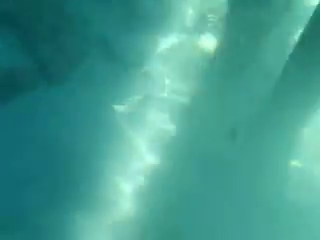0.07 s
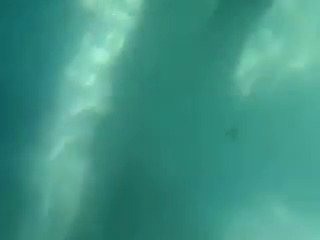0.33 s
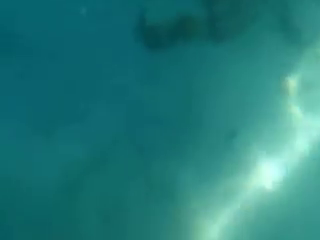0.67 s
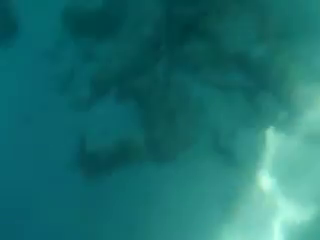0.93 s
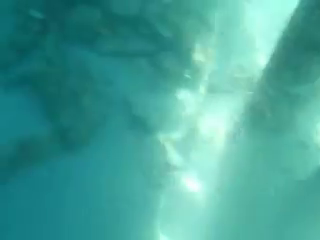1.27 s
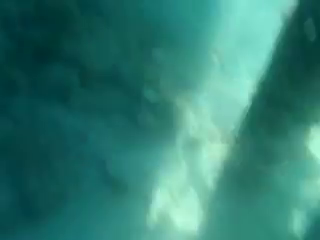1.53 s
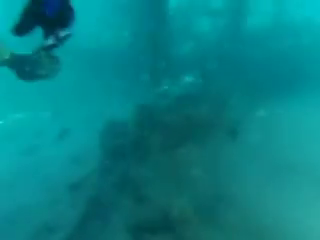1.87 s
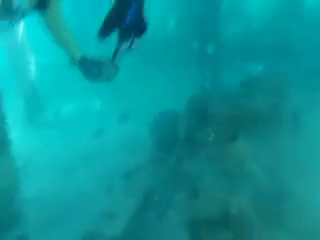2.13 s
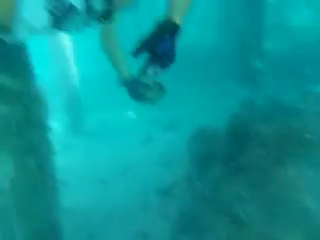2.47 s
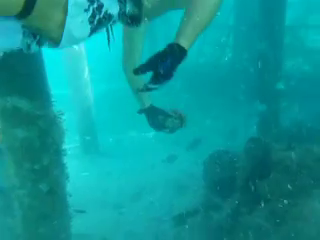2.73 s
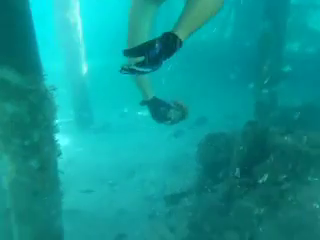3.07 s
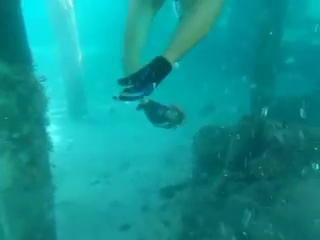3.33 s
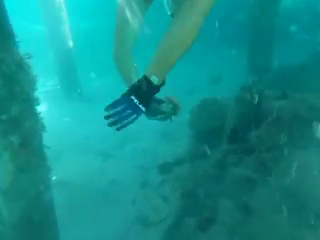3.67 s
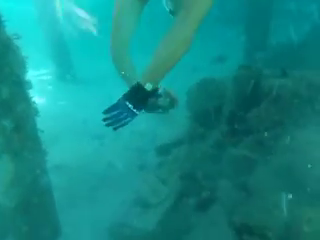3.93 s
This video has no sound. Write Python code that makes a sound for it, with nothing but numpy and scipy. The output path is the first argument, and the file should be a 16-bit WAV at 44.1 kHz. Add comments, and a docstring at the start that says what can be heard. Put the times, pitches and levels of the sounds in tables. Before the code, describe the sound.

Muffled underwater movement, hollow and rumbling, with small gurgling bubbles and two hard knocks.

```python
"""A hollow, wavering note sounds as a camera is carried through shallow sea water: the flow drives a resonance
of its housing. Eddies rumble against it, and small bubbles gurgle, tick and fizz. A few light taps and two hard
knocks strike it. The knocks overload the microphone; after each, a faint buzz lingers, and the sound falls
quiet and builds up again."""
import sys
import numpy as np
from scipy.fft import rfft, irfft, next_fast_len
from scipy.io import wavfile
from scipy.ndimage import uniform_filter1d

SR = 44100
rng = np.random.default_rng(int(sys.argv[2]) if len(sys.argv) > 2 else 0)


def store_wav(level_fs):
    """Save 16-bit WAV to argv[1]."""
    pcm = np.round(np.clip(np.atleast_2d(level_fs), -1, 1) * 32767)
    wavfile.write(sys.argv[1], SR, pcm.T.astype(np.int16))


N = 176400


def amp(db):
    """Decibels to amplitude ratio."""
    return 10 ** (np.asarray(db) / 20)


def unit(x):
    """Normalisation to rms 1."""
    return x / np.sqrt(np.mean(x ** 2) + 1e-20)


def gain_at(points, hz):
    """Amplitude response from (frequency, gain) points, interpolated on a log frequency axis."""
    freqs, db = np.transpose(points)
    return amp(np.interp(np.log(hz + 1), np.log(freqs + 1), db))


def envelope(stretches, offset_db):
    """Amplitude envelope from stretches of (time, level) points, interpolated in decibels."""
    times, db = np.vstack(stretches).T
    return amp(np.interp(np.arange(N) / SR, times, db) + offset_db)


def filtered(x, response):
    """Linear filtering: the spectrum is multiplied by a frequency response."""
    size = next_fast_len(N + SR // 2)
    return irfft(rfft(x, size) * response(np.fft.rfftfreq(size, 1 / SR)), size)[:N]


def coloured(x, spectrum):
    """Spectral shaping, at rms 1."""
    return unit(filtered(x, lambda hz: gain_at(spectrum, hz)))


def patter(per_s, spread_db):
    """Shot noise: impulses of random time, sign and size, at rms 1."""
    impulses = (rng.random(N) < per_s / SR) * rng.choice([-1, 1], N)
    return unit(impulses * amp(spread_db * np.clip(rng.standard_normal(N), -2, 2)))


def add(track, start_s, sound):
    """Superpose a sound on the track."""
    part = track[round(start_s * SR):][:len(sound)]
    part += sound[:len(part)]


def ping(hz, t60, attack_s):
    """One damped mode with a peak of 1; its decay is 60 dB in t60 seconds."""
    t = np.arange(SR // 5) / SR
    mode = np.sin(2 * np.pi * hz * t) * amp(-60 * t / t60) * (1 - np.exp(-t / attack_s))
    return mode / np.abs(mode).max()


def pings(events, attack_s, t60=None):
    """One damped mode per row (time, level, frequency), with the row's own t60 if it has one."""
    out = np.zeros(N)
    for s, db, hz, *own_t60 in events:
        add(out, s, amp(db) * ping(hz, own_t60[0] if own_t60 else t60, attack_s))
    return out


# Ring envelope, in stretches divided by the knocks (time [s], relative level [dB])
RING_LEVELS = [
    [(0.0, -26.5), (0.216, -28), (0.286, -19), (0.348, -23.5), (0.386, -14.5), (0.64, -35), (0.71, -17.5),
     (0.814, -31), (0.996, -18), (1.44, -28), (1.482, -16.5), (1.58, -33.5), (1.646, -17), (1.69, -20.5)],
    [(1.73, -62), (1.76, -56.5), (2.132, -46), (2.184, -16.5), (2.262, -20), (2.282, -30.5), (2.538, -22),
     (2.59, -29), (2.646, -23), (2.68, -44.5), (2.868, -30), (2.962, -37.5), (2.982, -28.5), (3.08, -30.5)],
    [(3.12, -47.5), (3.142, -56), (3.254, -54), (3.288, -47.5), (3.442, -44), (3.59, -26.5), (3.704, -13.5),
     (3.73, -21.5), (3.816, -18), (3.87, -21.5), (3.896, -20), (3.928, -14), (3.962, -30), (4.0, -16)],
]
# Colour around the resonance (frequency [Hz], gain [dB])
RING_COLOUR = [(100, -25.5), (250, -1), (380, 1), (470, -1.5), (600, -9), (900, -12.5), (1500, -43)]
def housing_ring(note_hz=438.3, bandwidth_hz=42):
    """Forced resonance: random pushes of the flow make the housing ring at its hollow note."""
    resonance = lambda f: 1j * f * bandwidth_hz / (note_hz ** 2 - f ** 2 + 1j * f * bandwidth_hz)
    ring = coloured(filtered(patter(per_s=700, spread_db=5), resonance), RING_COLOUR)
    running_rms = np.sqrt(np.abs(uniform_filter1d(ring ** 2, size=3000)) + 1e-6)
    return ring / running_rms * envelope(RING_LEVELS, offset_db=-1.5)


# Gulps of water (time [s], peak level [dB], frequency [Hz])
WATER_GULPS = [(.277, -8.5, 472.6), (0.384, -11.5, 410), (1.472, -15, 408), (1.638, -14, 431),
               (1.66, -10, 400.6), (2.204, -16, 430), (3.040, -19, 448), (3.682, -18.5, 432),
               (3.795, -15, 526), (3.888, -10.5, 437.4), (3.955, -8, 450.3)]
def gulps():
    """Gradual excitation: gulps of water swell the ring near its resonance."""
    return pings(WATER_GULPS, attack_s=0.02, t60=0.046)


# Hard knocks (time [s], level [dB], push rise [s], rebound delay [s], rebound over push [dB],
# rebound rise [s])
HARD_KNOCKS = [(1.6984, 1, 0.00023, .0042, 0.5, 0.00047), (3.0899, 0, 0.0014, .0049, 3.5, .0003)]
def knocks(push_hz=84, decay_s=0.0034):
    """Heavily damped transient: a pressure step, then a rebound of opposite sign."""
    out, t = np.zeros(N), np.arange(SR // 10) / SR
    damped = np.exp(-t / decay_s) * np.cos(2 * np.pi * push_hz * t)
    push = lambda rise_s: np.clip(t / rise_s, 0, 1) * damped
    for s, db, rise_s, delay_s, rebound_db, rebound_rise_s in HARD_KNOCKS:
        add(out, s, -amp(db) * push(rise_s))
        add(out, s + delay_s, amp(db + rebound_db) * push(rebound_rise_s))
    return out


# Light taps (time [s], peak level [dB], frequency [Hz], t60 [s])
HOUSING_TAPS = [(0.235, -13, 401, .022), (.381, -11, 560, 0.013), (.4155, -12.5, 549, 0.021),
                (0.4914, -7.5, 421, 0.04), (1.153, -19, 483, 0.069), (1.9665, -30.5, 417, 0.013),
                (2.1798, -14, 440, .035), (2.6408, -7.5, 385, 0.014), (2.8134, -17.5, 387, 0.026),
                (2.9857, -12.5, 506, 0.024), (3.359, -36.5, 448, 0.11), (3.4517, -39, 415, 0.07)]
def taps():
    """Free vibration: after a brief contact, one mode of the housing dies away."""
    return pings(HOUSING_TAPS, attack_s=0.00069)


# Rumble envelope (time [s], relative level [dB])
EDDY_LEVELS = [
    [(0.0, -32.5), (0.478, -26), (0.528, -22.5), (0.624, -44.5), (0.79, -14), (0.844, -34.5),
     (0.886, -32.5), (0.922, -34), (1.384, -36.5), (1.42, -25), (1.562, -46.5), (1.64, -41)],
    [(1.74, -52), (1.842, -61), (2.072, -46.5), (2.094, -35), (2.128, -46.5), (2.198, -25), (2.324, -36.5),
     (2.61, -37.5), (2.646, -23.5), (2.676, -43), (3.062, -40), (3.07, -32)],
    [(3.13, -71), (3.142, -55), (3.258, -73), (3.268, -70.5), (3.508, -56), (3.548, -48.5), (3.762, -43.5),
     (3.788, -35.5), (3.83, -51), (3.91, -36), (3.932, -52), (4.0, -31.5)],
]
# Rumble colour (frequency [Hz], gain [dB])
EDDY_COLOUR = [(20, -15.5), (40, -16.5), (70, -3), (130, -3), (220, 1), (320, -12), (500, -20), (900, -54)]
def eddies():
    """Turbulent pressure fluctuation: eddies buffet the housing with a low rumble."""
    rumble = coloured(patter(per_s=500, spread_db=1.5), EDDY_COLOUR)
    return rumble * envelope(EDDY_LEVELS, offset_db=-2.5)


# Thuds of water (time [s], peak level [dB], frequency [Hz])
WATER_THUDS = [(0.517, -15, 148), (0.546, -16.5, 100), (0.7486, -7.5, 153), (0.7763, -11, 145),
               (0.7906, -5.5, 190), (.812, -19.5, 101), (0.8763, -12.5, 125), (1.42, -20, 280),
               (1.664, -12.5, 176), (2.087, -28.5, 74.6), (2.192, -20, 100), (2.229, -22.5, 70),
               (2.64, -19.5, 128)]
def thuds():
    """Soft impact: the yielding contact of water gives a slow rise and a low pitch."""
    return pings(WATER_THUDS, attack_s=0.0032, t60=0.029)


# Gurgle envelope (time [s], relative level [dB])
GURGLE_LEVELS = [
    [(0.0, -39), (0.046, -46.5), (0.36, -37), (0.382, -26), (0.476, -46.5), (0.496, -44), (0.542, -48),
     (0.744, -34.5), (0.822, -73), (0.982, -38), (1.408, -45.5), (1.524, -34), (1.538, -43.5), (1.67, -39),
     (1.68, -40)],
    [(1.73, -58), (1.868, -64.5), (2.124, -54.5), (2.184, -35), (2.312, -49), (2.344, -31), (2.494, -47.5),
     (2.542, -21.5), (2.624, -55), (2.64, -39), (2.658, -49), (2.968, -50), (2.986, -39.5), (3.014, -44),
     (3.07, -44.5)],
    [(3.12, -66), (3.178, -57), (3.386, -74), (3.4, -54.5), (3.468, -61.5), (3.544, -41.5), (3.626, -29.5),
     (3.666, -41), (3.678, -27.5), (3.764, -33), (3.806, -29), (3.822, -30.5), (3.928, -36.5),
     (3.948, -33.5), (4.0, -28.5)],
]
# Gurgle colour (frequency [Hz], gain [dB])
GURGLE_COLOUR = [(150, -25.5), (300, 0), (520, 1), (700, 0), (950, -1), (1300, -10.5), (1900, -12.5),
                 (3000, -32)]
def gurgle():
    """Incoherent superposition: many short-lived bubbles merge into a gritty gurgle."""
    swarm = np.zeros(N)
    for when, pitch, strength in rng.random((1400, 3)):
        hz = 520 * 3.5 ** pitch
        add(swarm, when * N / SR, amp(6.7 * strength) * ping(hz, t60=40 / hz, attack_s=0.00027))
    grit = 0.6 * patter(per_s=4000, spread_db=2)
    return coloured(unit(swarm) + grit, GURGLE_COLOUR) * envelope(GURGLE_LEVELS, offset_db=-0.5)


# Single bubbles (time [s], peak level [dB], frequency [Hz], t60 [s])
RINGING_BUBBLES = [(0.098, -31, 660, 0.035), (.494, -21, 706, 0.11), (.592, -29.5, 693, 0.059),
                   (.724, -27.5, 917, 0.04), (1.252, -21.5, 820, 0.0071), (1.420, -32.5, 680, 0.013),
                   (1.507, -24.5, 640, 0.048), (1.652, -32.5, 1660, 0.019), (2.521, -24, 818, 0.048),
                   (3.535, -35, 620, .06), (3.589, -33, 1102, 0.15), (3.048, -27, 626, 0.022),
                   (3.778, -21.5, 630, 0.058), (3.796, -16.5, 641, 0.053), (3.821, -33, 1696, 0.063),
                   (3.872, -26, 1736, 0.027), (3.943, -24.5, 760, 0.043)]
def single_bubbles():
    """Bubble resonance: the enclosed air is a spring, the surrounding water its mass."""
    return pings(RINGING_BUBBLES, attack_s=0.00069)


# Bubble ticks (time [s], peak level [dB], frequency [Hz], half-width [s])
BUBBLE_TICKS = [(0.182, -29.5, 3000, 0.00043), (0.247, -27, 2400, 0.00038), (0.2588, -13, 2500, 0.00048),
                (.606, -22.5, 2000, 0.00037), (1.0725, -14, 1510, 0.00011), (1.0804, -17, 1540, 0.00011),
                (1.3187, -22.5, 2900, 0.00046), (1.468, -20.5, 2500, 0.00035),
                (2.2672, -19.5, 2500, 0.0002), (2.561, -21, 1500, .0006), (2.685, -36, 2750, 0.00064),
                (2.786, -32.5, 2400, 0.00033), (2.8644, -24, 2400, .0003)]
def ticks(lead_s=0.003, trail_s=0.01, trail_db=-14):
    """Short pulses have broad spectra: each pop is a tick, trailed by four weaker ones."""
    out, t = np.zeros(N), np.arange(-lead_s, lead_s, 1 / SR)
    pop = lambda hz, half_s: np.cos(2 * np.pi * hz * t) * np.exp(-(t / half_s) ** 2)
    for s, db, hz, half_s in BUBBLE_TICKS:
        add(out, s - lead_s, amp(db) * pop(hz, half_s))
        for delay, shift in rng.random((4, 2)):
            scattered_hz = hz * 2 ** (shift - 0.5)
            add(out, s - lead_s + delay * trail_s, amp(db + trail_db) * pop(scattered_hz, half_s))
    return out


# Fizz envelope (time [s], relative level [dB])
FIZZ_LEVELS = [
    [(0.0, -34), (0.008, -51), (0.232, -50), (0.262, -41.5), (0.276, -53), (0.34, -51), (1.43, -49.5),
     (1.446, -47), (1.68, -50)],
    [(1.73, -67.5), (2.012, -56.5), (2.274, -49), (2.282, -54), (2.382, -44.5), (2.498, -54.5),
     (2.562, -40), (2.584, -52), (3.07, -49)],
    [(3.12, -59.5), (3.136, -62), (3.624, -49.5), (3.802, -50.5), (3.824, -45.5), (3.862, -53.5),
     (3.872, -44), (3.908, -45.5), (4.0, -50)],
]
# Fizz colour (frequency [Hz], gain [dB])
FIZZ_COLOUR = [(700, -13), (1200, 3), (1700, 1), (2100, -0.5), (2600, 0), (3400, -4), (4000, -8),
               (5000, -28.5)]
def fizz():
    """Band-limited noise: fine bubbles blend into a hiss from which sparse impulses crackle."""
    crackle = 0.55 * patter(per_s=300, spread_db=5)
    spray = coloured(rng.standard_normal(N) + crackle, FIZZ_COLOUR)
    return spray * envelope(FIZZ_LEVELS, offset_db=-1)


# Colour of the noise that roughens the buzz (frequency [Hz], gain [dB])
RASP_COLOUR = [(100, -3), (600, 0), (1500, -2), (3000, -8.5), (4200, -10), (6000, -29.5)]
def buzz(pulse_hz=86.8, half_width_s=0.001, fade_db_per_s=40, delay_s=0.024, rasp_depth=0.48):
    """Amplitude modulation: noise roughens a faint pulse train that lingers after each knock."""
    out, t = np.zeros(N), np.arange(SR // 4) / SR
    from_pulse_s = ((t * pulse_hz) % 1 - 0.5) / pulse_hz
    pulses = np.exp(-(from_pulse_s / half_width_s) ** 2) * amp(-37.5 - fade_db_per_s * t)
    for s, *_ in HARD_KNOCKS:
        add(out, s + delay_s, pulses)
    return out * (1 + rasp_depth * coloured(rng.standard_normal(N), RASP_COLOUR))


# Background colour (frequency [Hz], gain [dB])
FLOOR_COLOUR = [(20, -3), (80, 21), (200, -13.5), (450, -12), (700, -3.5), (1500, -24.5), (3300, -16),
                (4200, -12)]
def noise_floor():
    """Stationary noise: a faint, steady background, strongest in the bass."""
    return amp(-60.5) * coloured(rng.standard_normal(N), FLOOR_COLOUR)


def scene():
    """Superposition: the pressures of all sources add at one microphone."""
    background = noise_floor()
    flow = housing_ring() + gulps() + eddies() + thuds()
    bubbles = gurgle() + fizz() + single_bubbles() + ticks()
    impacts = knocks() + taps() + buzz()
    return (flow + bubbles + impacts + background)[None]


# Treble response of the camera after clipping (frequency [Hz], gain [dB])
CAMERA_TREBLE = [(3500, 0), (4600, -6.5), (6000, -8), (8000, -2.5), (15000, -10)]
def record(dry, muffle_hz=4130, clip_level=0.71, top_hz=15800):
    """Low-pass filtering and saturation: the camera muffles the treble and clips the hardest peaks."""
    muffled = filtered(dry[0], lambda hz: 1 / np.sqrt(1 + (hz / muffle_hz) ** 56))
    clipped = np.clip(muffled, -clip_level, clip_level)
    return filtered(clipped, lambda hz: gain_at(CAMERA_TREBLE, hz) * (hz < top_hz))[None]


dry = scene()
out = record(dry)
store_wav(out)
```